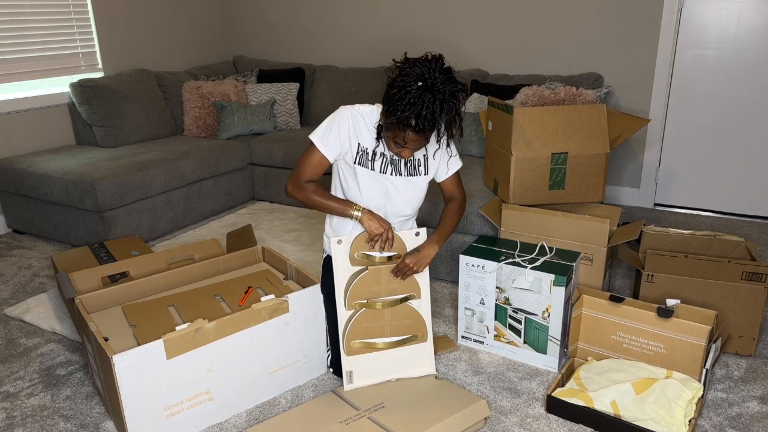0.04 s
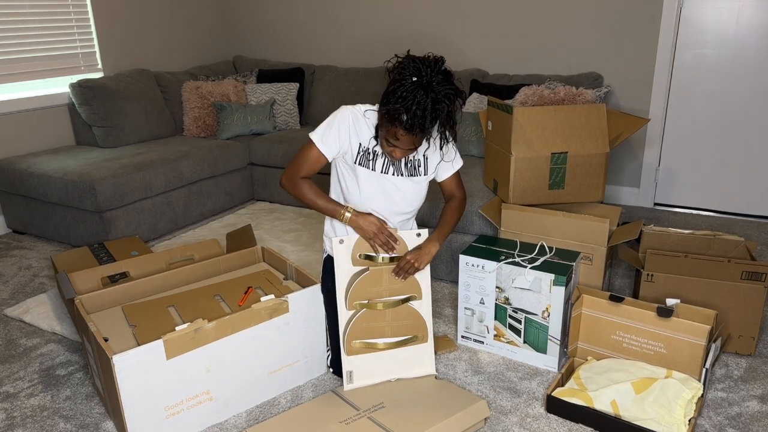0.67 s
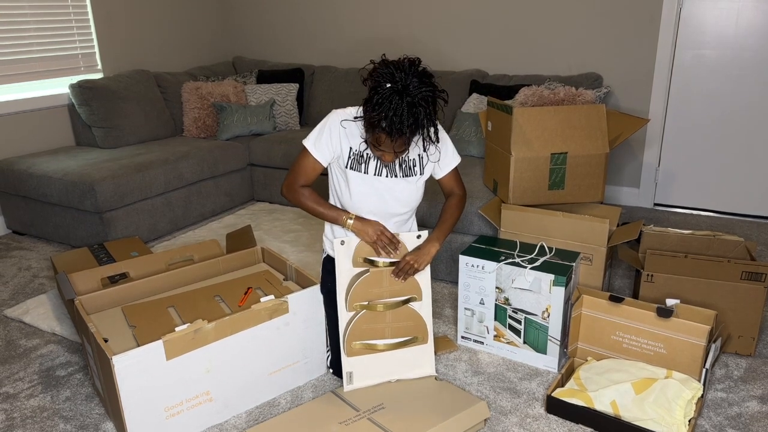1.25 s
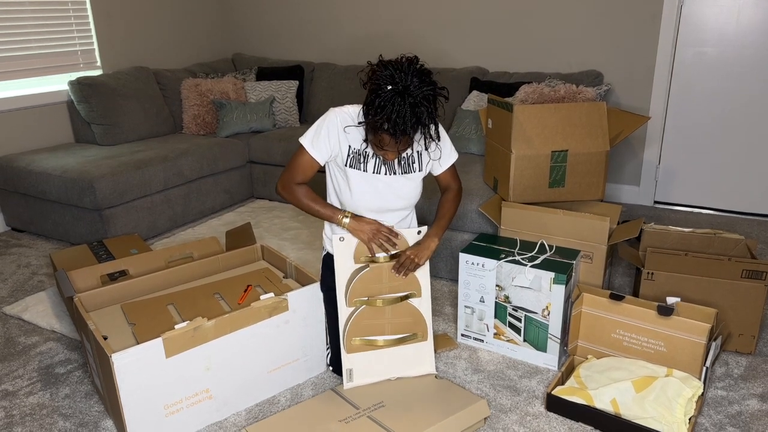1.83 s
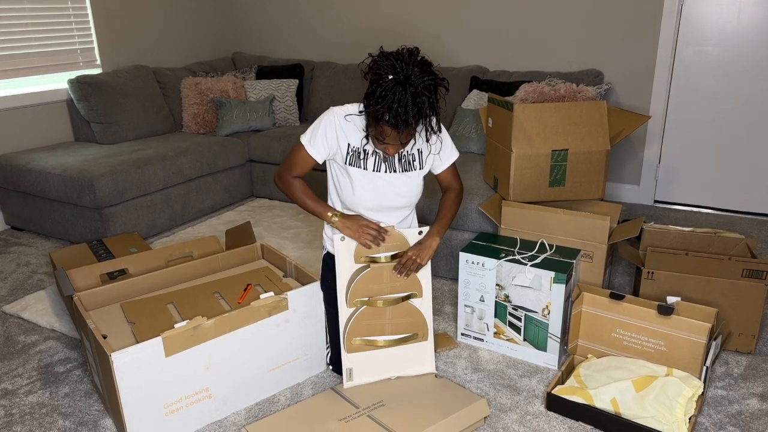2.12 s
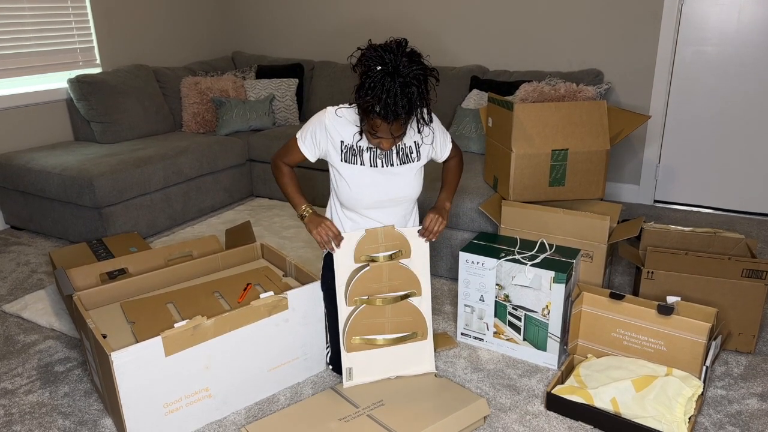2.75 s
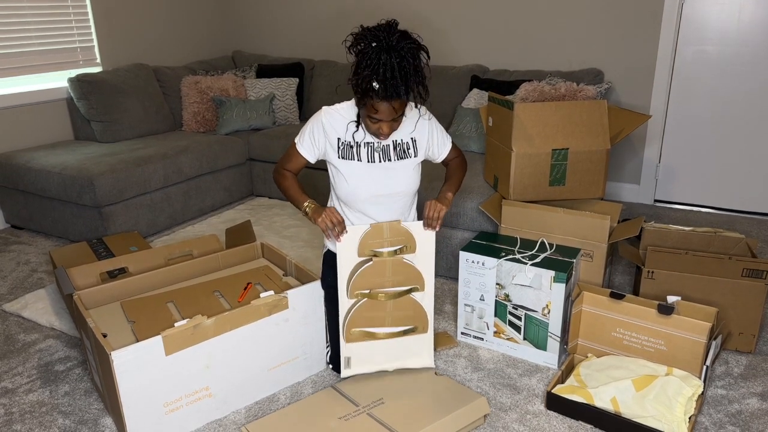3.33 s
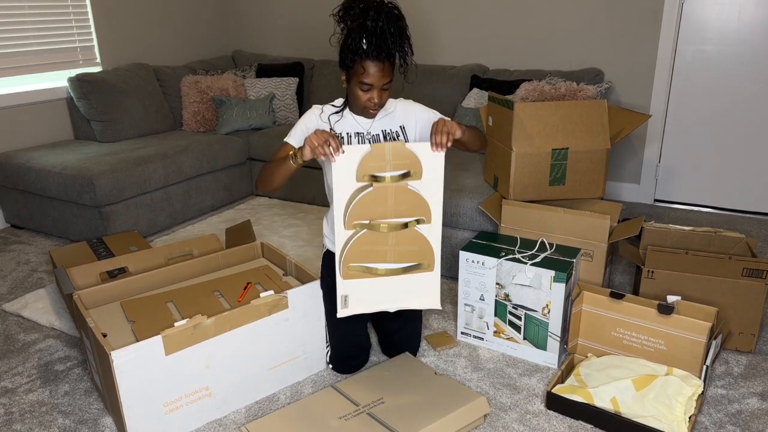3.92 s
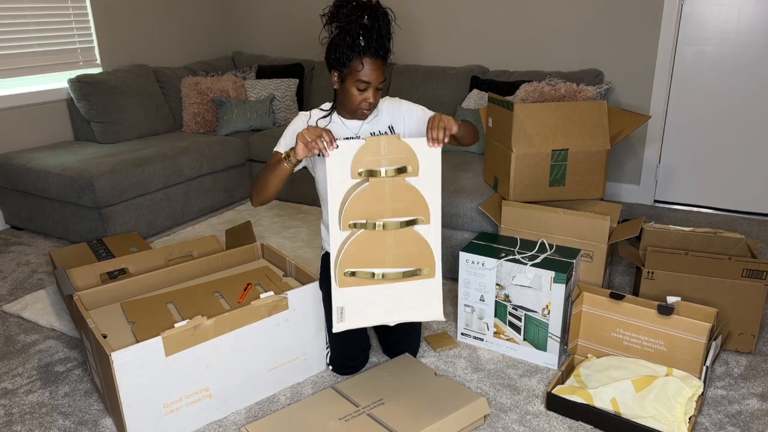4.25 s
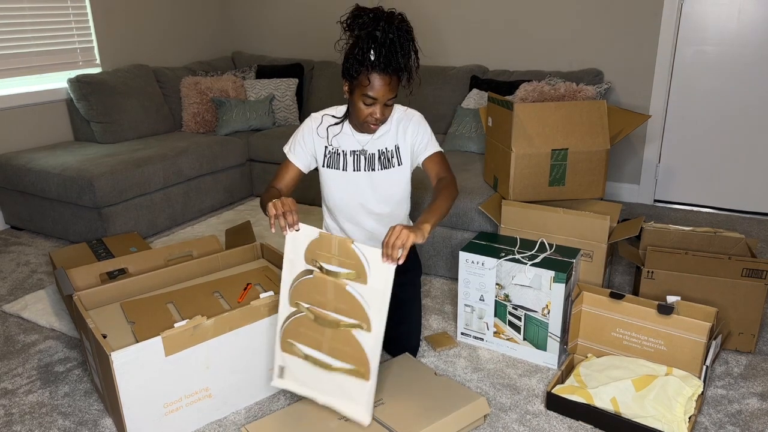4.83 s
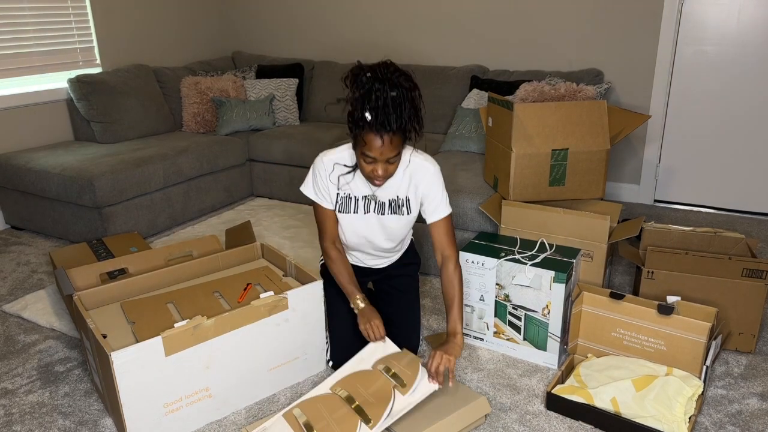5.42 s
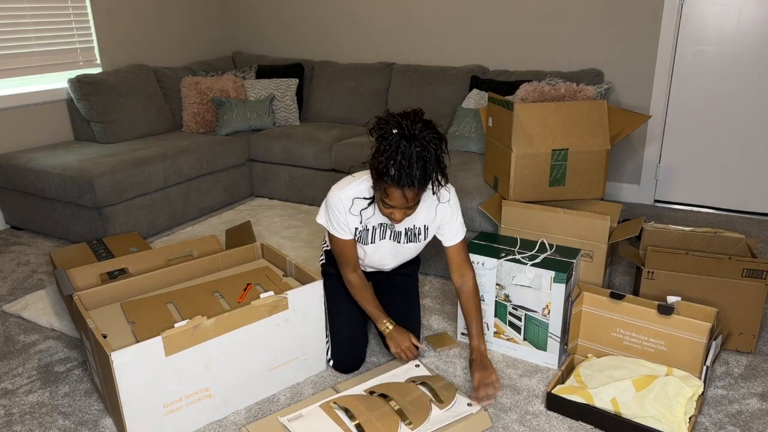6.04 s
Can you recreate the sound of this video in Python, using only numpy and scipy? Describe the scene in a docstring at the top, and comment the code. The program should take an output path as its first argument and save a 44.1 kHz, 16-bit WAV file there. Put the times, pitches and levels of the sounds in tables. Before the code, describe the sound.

Fingers softly rub and pick at a cardboard-backed package, with a sharp snap, small clicks and a faint squeak. The handling grows quieter as the package is lifted. It then drops onto a carton with a loud, hollow thump, scrapes along it and knocks once more. The room echoes briefly, with a low steady rumble underneath.

```python
"""Handling and dropping a package

Fingers rub and pick at a cardboard-backed package on a living room carpet, and a tab snaps free.
The package is lifted and dropped flat on a carton with a hollow thump. It is pushed along the
carton, card scraping on card, and knocked once more. The room echoes briefly over a low rumble."""
import sys
import numpy as np
from scipy import signal
from scipy.fft import rfft, irfft, next_fast_len
from scipy.io import wavfile
from scipy.ndimage import map_coordinates

SR = 44100
rng = np.random.default_rng(int(sys.argv[2]) if len(sys.argv) > 2 else 0)


def dump(signal):
    """Clip the signal to [-1, 1] and save it as 16-bit WAV at the path in sys.argv[1]."""
    limited = np.clip(np.atleast_2d(signal).T, -1, 1)
    pcm = np.round(limited * 32767).astype(np.int16)
    wavfile.write(sys.argv[1], SR, pcm)


N = 267819

# the room's rumble and faint hiss: f/Hz, level/dB
RUMBLE_SPECTRUM = [(22, -36), (32, -19), (50, -6), (68, -2), (86, -1.5), (102, -15), (135, -5),
                   (170, -15.5), (310, -16), (700, -22), (1650, -25.5), (3600, -29.5), (8600, -38),
                   (15800, -39)]
# a faint electrical whine: f/Hz, level/dB
WHINE_TONES = [(7250, -80), (10650, -75.5)]
# how long the room echoes: f/Hz, t60/s (the time to fade by 60 dB)
ROOM_DECAY = [(100, 0.17), (500, 0.65), (2500, 0.4), (6000, 0.4), (15000, 0.16)]
# first echoes from nearby surfaces: delay/s, level/dB
WALL_ECHOES = [(.0025, -17), (.0098, -32), (0.0212, -22.5)]
# fingers and palms stroke the card: t/s, length/s, rub level/dB, hiss level/dB
STROKES = [(-.02, 0.057, -41, -48), (0.06, 0.058, -39, -45), (0.369, 0.15, -49.5, -44),
           (0.503, 0.11, -48, -44.5), (0.703, 0.056, -49, -52.5), (0.786, 0.033, -47.5, -58),
           (0.859, .11, -45.5, -53), (0.977, 0.076, -40, -50.5), (1.133, 0.14, -44.5, -46.5),
           (1.306, 0.11, -41.5, -48), (1.399, 0.1, -40.5, -42.5), (1.548, 0.094, -37, -41),
           (1.673, .12, -46.5, -52), (1.804, 0.037, -44.5, -51), (1.86, 0.053, -47.5, -46.5),
           (1.953, 0.32, -51.5, -43.5), (2.179, 0.024, -44.5, -39.5), (2.305, 0.21, -44.5, -45),
           (2.445, .2, -43.5, -46.5), (2.747, 0.08, -51.5, -51), (2.937, 0.056, -52.5, -52.5),
           (3.192, .05, -36, -41), (4.341, 0.082, -51, -50), (4.42, 0.23, -58.5, -62),
           (4.87, 0.052, -61.5, -65), (5.017, 0.067, -53.5, -62.5)]
# the sheet bends in the hands: t/s, length/s, level/dB
BENDS = [(.14, 0.18, -46), (.875, 0.11, -43.5), (1.0, .05, -48), (1.22, 0.023, -46.5), (2.68, 0.14, -50.5),
         (3.19, 0.096, -48.5), (3.405, 0.027, -48), (3.67, 0.032, -52.5), (4.04, 0.041, -53),
         (4.26, 0.04, -53.5), (5.02, 0.086, -53.5)]
# fingers rubbing card: f/Hz, level/dB
RUB_SPECTRUM = [(250, -19), (450, -7.5), (800, 1.5), (1100, -0.5), (1500, 0.5), (2200, 0.5), (3300, 1),
                (4500, -3.5), (7000, -17.5), (11000, -40)]
# the hiss of skin or card sliding: f/Hz, level/dB
HISS_SPECTRUM = [(2500, -6.5), (4500, 1.5), (6000, 1), (8500, -2.5), (11000, -1.5), (15500, -9)]
# the stiff panel singing under a firm stroke: f/Hz, level/dB
PANEL_SPECTRUM = [(500, -33), (950, -5), (1300, -4.5), (1600, -3), (2400, -30)]
# the sheet flexing: f/Hz, level/dB
FLEX_SPECTRUM = [(80, 15), (160, 2.5), (270, 10), (440, 8), (600, -5.5), (1200, -53)]
# the package is pushed over the carton: t/s, effort/dB
PUSH_EFFORT = [(5.45, -48), (5.676, -34.5), (5.884, -35), (5.988, -40.5), (6.005, -37.5)]
# card scraping on card: f/Hz, level/dB
SCRAPE_SPECTRUM = [(250, -33), (450, -8.5), (800, -2), (1300, 0.5), (2000, 0.5), (3300, -1), (4500, -6),
                   (7000, -9.5), (11000, -46)]
# the carton droning under the push: f/Hz, level/dB
DRONE_SPECTRUM = [(25, -26), (53, 4.5), (95, -14), (138, 2.5), (200, -18), (260, 1), (330, -2.5), (480, -5),
                  (900, -28)]
# bumps that set hollow cardboard ringing, first the handled package, then the carton: t/s, level/dB
BUMPS = [(0.139, -39.5), (4.16, -47.5), (4.369, -40.5), (5.149, -1.5), (5.56, -38.5), (5.63, -33.5),
         (6.017, -18.5)]
# low tones of the cardboard and the room: f/Hz, level/dB, rise/s, t60/s
THUMP_TONES = [(52.8, -16.5, .06, 0.43), (69.5, -26.5, 0.015, 0.79), (121.5, -11.5, 0.032, 0.22),
               (136.6, -5, 0.057, 0.18), (170.7, -15.5, 0.046, 0.25), (227.6, -24, 0.03, 0.39),
               (265.8, -14.5, 0.034, 0.32), (288, -28.5, 0.017, 0.49), (294, -27, 0.058, 0.34),
               (362, -23.5, 0.0054, 0.54), (388, -23, 0.037, 0.5), (425.5, -14, 0.0041, 0.32),
               (475, -14.5, 0.052, 0.23), (493, -25, 0.021, 0.35), (535, -33.5, 0.033, 0.94),
               (587, -28, 0.056, 0.19), (690, -20, 0.032, 0.22), (825, -30, 0.029, 0.37),
               (1202, -23, 0.013, 0.28)]
# edges slapping down on the carton: t/s, level/dB, t60/s
SLAPS = [(5.141, -35, 0.35), (5.151, -16, 0.29), (5.167, -10.5, 0.091), (5.17, -23, 0.59),
         (6.023, -28.5, .25)]
# the noise of one slap: f/Hz, level/dB
SLAP_SPECTRUM = [(100, -16), (300, 13), (800, 3.5), (1500, 1), (2300, -4), (3400, -7), (5000, -11),
                 (9000, -14.5), (15500, -22.5)]
# snaps and taps of the card: t/s, level/dB, f/Hz, click level within the tap/dB
TAPS = [(.129, -24.5, 1980, -1), (.299, -31, 1460, -10), (1.0683, -6, 1950, -11), (1.0736, -1.5, 2650, -26),
        (1.0765, -15, 900, -14), (1.232, -31.5, 644, -20), (1.603, -18, 1400, -4), (1.67, -20, 4500, -2),
        (2.192, -24, 2300, -10), (2.426, -24, 2500, -8), (2.503, -17.5, 1940, -3), (2.552, -22, 2600, -5),
        (2.701, -35, 650, -19), (2.772, -34.5, 750, -2), (3.414, -31.5, 1500, -12),
        (3.419, -35.5, 560, -14), (3.683, -38.5, 750, -7), (3.856, -37.5, 10600, 3.5),
        (4.055, -42.5, 565, -11), (4.378, -32.5, 920, 0.5), (5.036, -36.5, 980, -11),
        (5.1408, -21.5, 1210, 4.5), (5.1663, -1.5, 3360, -7.5), (5.919, -19.5, 960, 0),
        (5.951, -19, 7040, -13), (6.006, -19, 860, -19), (6.023, -5.5, 1140, -1.5), (6.041, -19, 820, 3.5)]
# the sharp click of a tap: f/Hz, level/dB
CLICK_SPECTRUM = [(90, -24), (220, -6), (450, 4.5), (1000, -0.5), (3500, -1), (6000, -5.5), (10000, -12.5),
                  (15500, -27)]

RUB_FADE_DB_PER_S, HISS_FADE_DB_PER_S, BEND_FADE_DB_PER_S = 163, 185, 168  # once the hand stops


def amp(db):
    """Turn decibels into a gain."""
    return 10 ** (np.asarray(db) / 20)


def unit(x):
    """Scale x to an average strength (rms) of 1."""
    return x / np.sqrt(np.mean(x ** 2) + 1e-20)


def along(points, hz):
    """Read between (f/Hz, value) points on a log frequency axis."""
    freqs, values = np.transpose(points)
    return np.interp(np.log(hz + 1), np.log(freqs), values)


def gain_curve(rows):
    """A gain through (t/s, level/dB) points, fading out before and after them."""
    times, levels = np.transpose(rows)
    t = np.arange(N) / SR
    outside_s = np.maximum(times[0] - t, 0) + np.maximum(t - times[-1], 0)
    return amp(np.interp(t, times, levels) - 49 * outside_s)


def filtered(x, response):
    """Scale each frequency in x by response(hz)."""
    size = next_fast_len(len(x) + SR // 4)
    return irfft(rfft(x, size) * response(np.fft.rfftfreq(size, 1 / SR)), size)[:len(x)]


def coloured(x, spectrum):
    """Shape x with a spectrum and scale it to rms 1."""
    return unit(filtered(x, lambda hz: amp(along(spectrum, hz))))


def noise(spectrum, samples=N):
    """Noise of rms 1 with the given spectrum."""
    return coloured(rng.standard_normal(samples), spectrum)


def wobble(rate):
    """A smooth curve through `rate` random points a second."""
    points = rng.standard_normal(int(N * rate / SR) + 4)
    return map_coordinates(points, [np.arange(N) * rate / SR])


def add(track, start, sound):
    """Mix a sound into the track, `start` seconds in."""
    part = track[max(round(start * SR), 0):][:len(sound)]
    part += sound[:len(part)]


def gesture(start, length, fade_db_per_s, rise_share=0.55):
    """Gain of one hand movement: it swells for a share of its length, holds, then fades."""
    t = np.arange(N) / SR - start
    swell = np.sin(np.pi / 2 * np.clip(t / (rise_share * length), 0, 1))
    return swell * amp(-fade_db_per_s * np.maximum(t - length, 0))


def gestures(rows, fade_db_per_s):
    """Joint gain of (t/s, length/s, level/dB) movements; overlapping ones add in power."""
    return np.sqrt(sum((amp(db) * gesture(s, length, fade_db_per_s)) ** 2 for s, length, db in rows))


def background():
    """The room's steady rumble and faint hiss, with a fuzzy electrical whine."""
    t = np.arange(N) / SR
    whine = np.zeros(N)
    for hz, db in WHINE_TONES:
        fuzz = noise([(50, 13), (300, -19), (900, -68)])
        whine += amp(db) * unit(fuzz * np.sin(2 * np.pi * hz * t))
    return amp(-52.5) * noise(RUMBLE_SPECTRUM) + whine


def room(x, tail_db):
    """Add the room's first echoes and a soft tail that lasts longest in the middle pitches."""
    hz, t, bands = signal.stft(rng.standard_normal(SR // 2), SR, nperseg=256)
    fade = amp(-60 * t / along(ROOM_DECAY, hz)[:, None])
    tail = signal.istft(bands * fade, SR, nperseg=256)[1]
    echoes = amp(tail_db) * np.pad(tail / np.linalg.norm(tail), (SR // 250, 0))  # starts 4 ms late
    for delay, db in WALL_ECHOES:
        echoes[round(delay * SR)] += amp(db)
    return x + signal.fftconvolve(x, echoes)[:len(x)]


def friction(spectrum, catches_per_s, catch_db, uneven_db):
    """Paper fibres rub: countless tiny slips and a few stronger catches, under uneven pressure."""
    catches = (rng.random(N) < catches_per_s / SR) * rng.standard_normal(N)
    slips = rng.standard_normal(N) + amp(catch_db) * unit(catches)
    pressure = amp(uneven_db * wobble(45))
    return coloured(room(slips * pressure, tail_db=-10.5), spectrum)


def squeak():
    """A fingertip slips fast and unevenly along the card's edge; the pitch falls as it slows."""
    start_s, length_s, slowing_s = 2.015, 0.31, 0.074
    start_hz, end_hz = 4670, 3110
    t = np.arange(N) / SR
    speed = np.exp(-((t - start_s) / slowing_s) ** 2)
    phase = 2 * np.pi * np.cumsum(end_hz + (start_hz - end_hz) * speed) / SR
    level = amp(-46) * gesture(start_s, length_s, RUB_FADE_DB_PER_S, rise_share=0.08)
    flutter = noise([(250, -9.5), (600, -13), (1600, -28.5)])
    return level * unit(flutter * np.sin(phase))


def hands():
    """Fingers rub the card, skin hisses over its coating, the panel sings and the sheet flexes."""
    lift_s, hiss_lag_s = 3.3, 0.0072  # the skin hisses just after the finger bites
    rub_strokes = [(s, length, db) for s, length, db, _ in STROKES]
    hiss_strokes = [(s + hiss_lag_s, length, db) for s, length, _, db in STROKES]
    # the resting hands creep over the card until it is lifted
    grip = gesture(-1, 1 + lift_s, RUB_FADE_DB_PER_S, rise_share=0.1)
    rub = np.hypot(gestures(rub_strokes, RUB_FADE_DB_PER_S), amp(-55.5) * grip)
    hiss = np.hypot(gestures(hiss_strokes, HISS_FADE_DB_PER_S), amp(-60) * grip)
    flex = np.hypot(gestures(BENDS, BEND_FADE_DB_PER_S), amp(-14.5) * rub)  # rubbing bends it too
    panel = amp(-39.5) * (rub / amp(-35)) ** 1.91  # grows 1.91 dB for each dB of rub
    rubbing = amp(-1) * rub * friction(RUB_SPECTRUM, catches_per_s=390, catch_db=-20, uneven_db=1.2)
    hissing = amp(0.5) * hiss * friction(HISS_SPECTRUM, catches_per_s=150, catch_db=-15, uneven_db=1.6)
    singing = panel * friction(PANEL_SPECTRUM, catches_per_s=150, catch_db=-16, uneven_db=-1.0)
    flexing = amp(-0.5) * flex * friction(FLEX_SPECTRUM, catches_per_s=65, catch_db=-4, uneven_db=3.5)
    return rubbing + hissing + singing + flexing


def slide():
    """Card scrapes over card, hissing more the harder it is pushed; the hollow carton drones below."""
    full_push, drone_lag_s = amp(-33.5), 0.12  # the drone builds up late
    push = gain_curve(PUSH_EFFORT)
    drone = gain_curve([(s + drone_lag_s, db) for s, db in PUSH_EFFORT])
    hiss = full_push * (push / full_push) ** 2.44  # grows 2.44 dB for each dB of effort
    scraping = amp(1.5) * push * friction(SCRAPE_SPECTRUM, catches_per_s=890, catch_db=-7, uneven_db=1.5)
    hissing = amp(1.6) * hiss * friction(HISS_SPECTRUM, catches_per_s=600, catch_db=-9, uneven_db=1.7)
    return scraping + hissing + amp(-3.5) * drone * noise(DRONE_SPECTRUM)


def taps():
    """Each tap rings a patch of card for a few cycles and crushes its fibres."""
    track, t = np.zeros(N), np.arange(SR // 2) / SR
    for start, db, hz, click_db in TAPS:
        t60 = 0.057 * (hz / 1000) ** -1.07  # smaller, higher patches die away sooner
        onset = 1 - np.exp(-t / (0.2 * t60 ** 2.015))  # longer contacts start more softly
        crush = onset * amp(-60 * t / t60)
        width_hz = 1.09 * hz  # the patch passes a broad band around its pitch
        patch = lambda f: (1j * f * width_hz / (hz * hz - f * f + 1j * f * width_hz)) ** 3
        crunch = filtered(crush * rng.standard_normal(len(t)), patch)
        rattle = unit(crunch) * np.sqrt(np.mean(crush ** 2))
        click = amp(click_db) * crush * noise(CLICK_SPECTRUM, len(t))
        ring = onset * np.sin(2 * np.pi * hz * t) * amp(-60 * t * hz / 12)  # fades in 12 cycles
        add(track, start, amp(db) * room(ring + 0.42 * (rattle + click), tail_db=-8))
    return track


def slaps():
    """The package meets the carton edge by edge, each a short burst of noise."""
    track, t = np.zeros(N), np.arange(SR // 2) / SR
    for start, db, t60 in SLAPS:
        add(track, start, noise(SLAP_SPECTRUM, len(t)) * amp(db - 60 * t / t60))
    return room(track, tail_db=-13)


def hollow_thumps():
    """After each bump, low tones of the cardboard and the room build up briefly, then die away."""
    track, t = np.zeros(N), np.arange(SR) / SR
    for start, db in BUMPS:
        for hz, tone_db, rise, t60 in THUMP_TONES:
            swell = np.sin(np.pi / 2 * np.minimum(t / rise, 1)) ** 2
            fade = amp(db + tone_db - 60 * np.maximum(t - rise, 0) / t60)
            add(track, start, swell * fade * np.sin(2 * np.pi * (hz * t + rng.random())))
    return track


def scene():
    """Add all the sources into one channel."""
    return (hands() + squeak() + taps() + slaps() + hollow_thumps() + slide() + background())[None]


def record(dry):
    """Round off the highest peaks and cut the very top of the treble."""
    top_hz = 15850
    rounded = dry[0] / (1 + np.abs(dry[0]) ** 6) ** (1 / 6)
    return filtered(rounded, lambda hz: hz < top_hz)[None]


dry = scene()
out = record(dry)
dump(out)
```